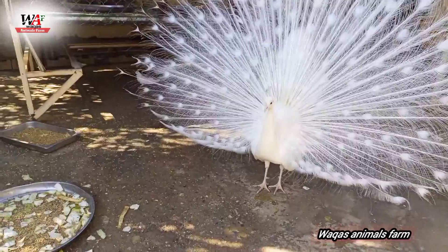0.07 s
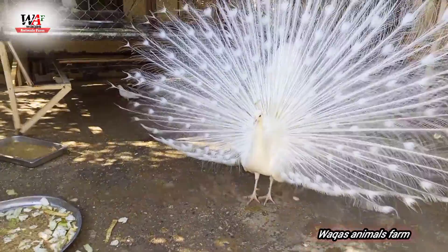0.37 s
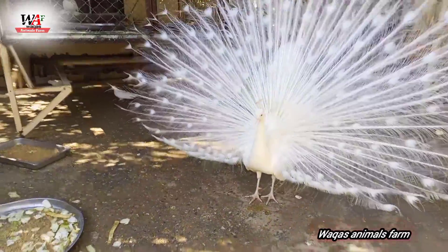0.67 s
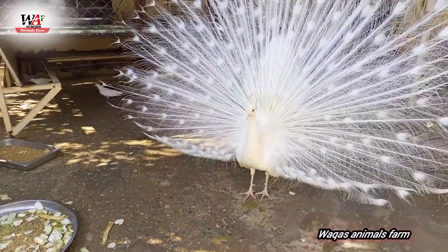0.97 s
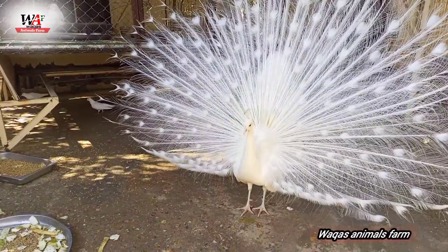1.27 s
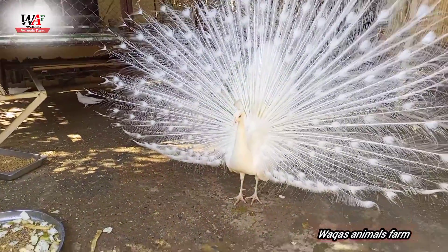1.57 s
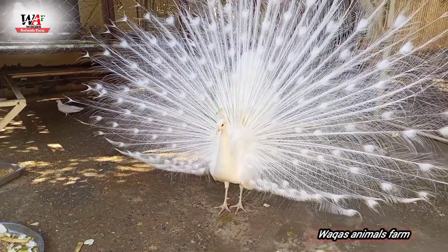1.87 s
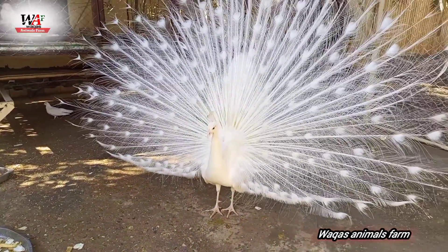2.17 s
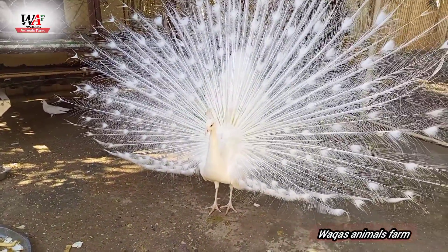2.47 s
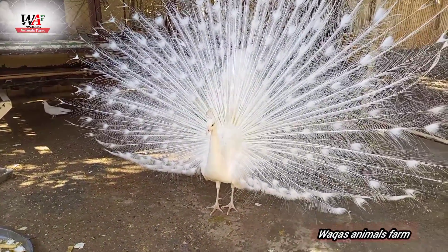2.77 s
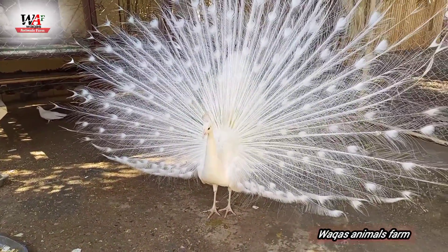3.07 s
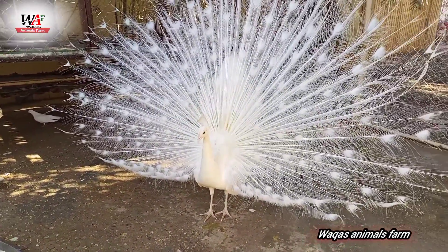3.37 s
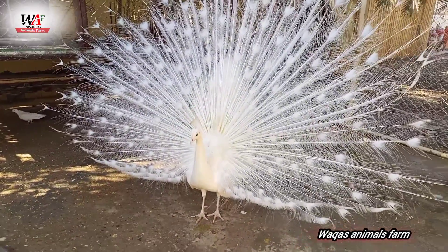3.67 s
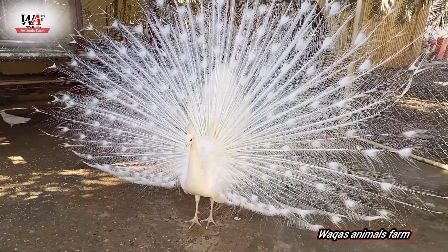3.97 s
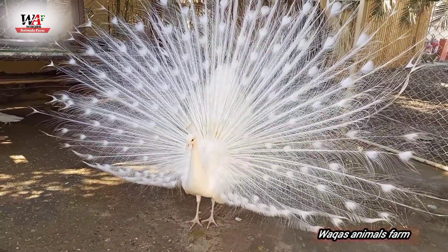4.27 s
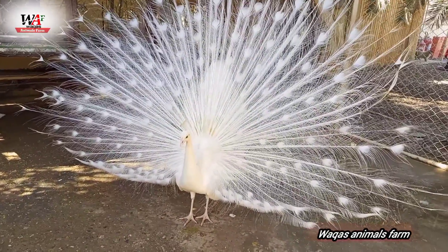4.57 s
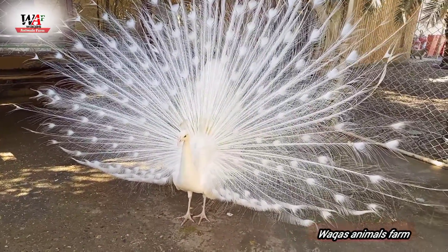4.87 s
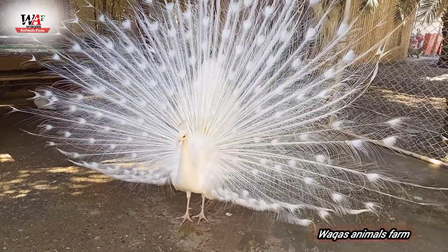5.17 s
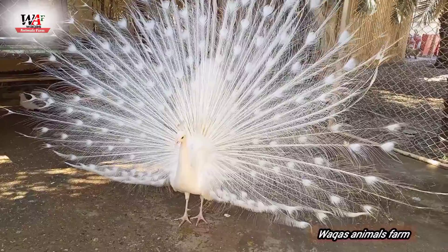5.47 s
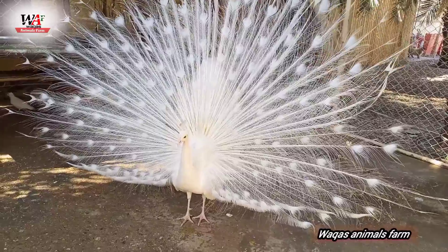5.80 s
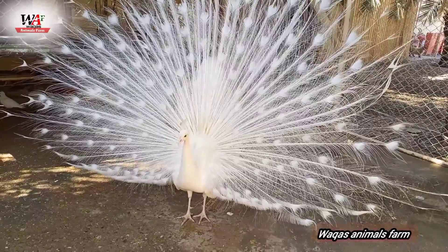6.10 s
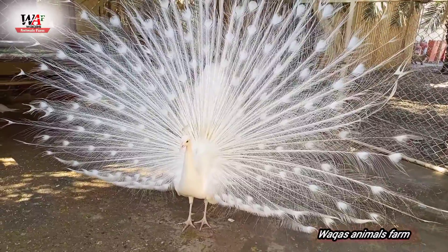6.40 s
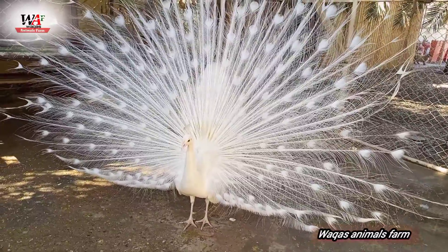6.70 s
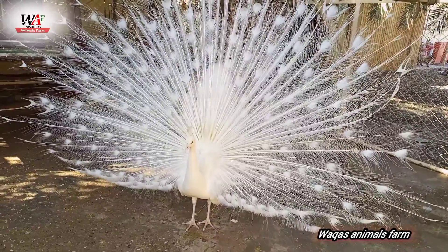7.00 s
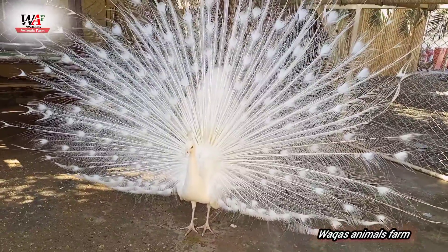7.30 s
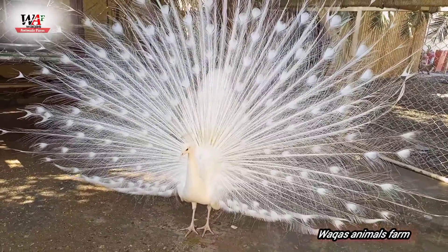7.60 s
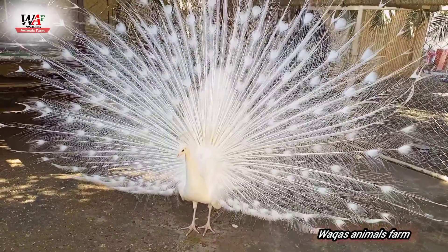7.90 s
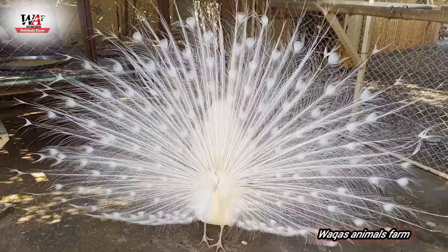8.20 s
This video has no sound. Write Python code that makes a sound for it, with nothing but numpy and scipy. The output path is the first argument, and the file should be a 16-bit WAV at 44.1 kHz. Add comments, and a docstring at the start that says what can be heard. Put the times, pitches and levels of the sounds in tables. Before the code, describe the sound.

Overlapping sparrow-like chirps, whistles and harsh churrs over soft outdoor air and a faint motor hum, with a couple of sharp knocks.

```python
"""A roofed farm pen, where a flock of sparrow-like birds chirps and scolds and hard walls smear every note.
Each call is a few harmonics gliding in pitch, shaken by the flutter of the bird's syrinx.
Two sharp clacks, a few ticks and two soft bumps sound nearby, each a noise burst through a resonance.
Underneath lie outdoor air, a motor's hum, faint far hoots and brief patches of high, grainy hiss.
One close microphone hears it all in mono."""
import sys
import numpy as np
from scipy import signal
from scipy.fft import rfft, irfft
from scipy.io import wavfile
from scipy.ndimage import uniform_filter1d

SR = 44100
rng = np.random.default_rng(int(sys.argv[2]) if len(sys.argv) > 2 else 0)


def unload_audio(sound):
    """Save the sound as a 16-bit wav file, at the path given as the first command line argument."""
    columns = np.transpose(np.atleast_2d(sound))
    # keep every value between -1 and 1, then stretch to whole-number steps
    steps = np.round(np.clip(columns, -1, 1) * 32767)
    wavfile.write(sys.argv[1], SR, steps.astype(np.int16))


N = 363825
TIME = np.arange(N) / SR

# The nearly pure timbre of a chirp. Each row: harmonic number, level in dB.
CHIRP_VOICE = [(1, 1), (2, -30.5), (3, -39.5)]
# Call shapes. Each gives starting pitch and ending pitch as shares of the middle pitch, then flutter depth.
CHIRP_SHAPE = (1.15, .83, 0.1016)  # a buzzy downward sweep
BUZZ_SHAPE = (1.04, 0.92, 0.109)  # a wide rasp, almost level
WHISTLE_SHAPE = (1.08, 0.94, 0.018)  # a clear downward slide
PEEP_SHAPE = (1.02, 0.97, 0.02)  # a thin held tone
CHEEP_SHAPE = (0.8, 0.79, 0.036)  # rises and falls


def undb(db):
    """Decibels to gain."""
    return 10 ** (np.asarray(db) / 20)


def unit(x):
    """Scale to rms 1."""
    return x / np.sqrt(np.mean(x ** 2) + 1e-20)


def add(track, s, sound):
    """Mix a sound into a track, starting at s seconds."""
    i = int(np.clip(s * SR, 0, N - 1))
    track[i:i + len(sound)] += sound[:N - i]


def curve(rows):
    """Join (seconds, value) rows by straight lines."""
    return np.interp(TIME, *np.transpose(rows))


def cut(x, hz, keep, order=2):
    """Keep the "low" or "high" side of a frequency."""
    return signal.sosfilt(signal.butter(order, hz, keep, fs=SR, output="sos"), x)


def resonance(x, hz, width_hz):
    """The same two-pole band-pass twice over, gain 1 at the centre."""
    peak = signal.iirpeak(hz, hz / width_hz, fs=SR)
    return signal.lfilter(*peak, signal.lfilter(*peak, x))


def walk(rate_hz):
    """Smooth random drift, rms 1."""
    hold = int(SR / rate_hz)
    steps = np.repeat(rng.standard_normal(N // hold + 1), hold)[:N]
    return unit(uniform_filter1d(steps, hold))


def air():
    """Outdoor air: a soft, broad noise bed that gently swells."""
    # The colour of the bed. Each row: frequency in Hz, relative level in dB.
    spectrum = [(25, -13.5), (50, -14.5), (100, -1), (200, 0), (320, -7), (850, -7), (1200, -8.5),
                (2000, -6), (4000, -8.5), (8000, -21.5), (10000, -30), (15500, -28)]
    # Its slow swell. Each row: time in seconds, level in dB.
    levels = [(0, -66), (3.2, -63), (5.4, -64.5), (6.5, -61.5)]
    hz, db = np.transpose(spectrum)
    bins_hz = np.maximum(np.arange(N // 2 + 1) * SR / N, 1)
    colour = undb(np.interp(np.log(bins_hz), np.log(hz), db))
    bed = unit(irfft(rfft(rng.standard_normal(N)) * colour, N))
    return bed * undb(curve(levels) + .5 * walk(9.3))


def motor(waver, wobble_db):
    """A motor's low hum, wandering slightly in speed and strength."""
    # The tones of the hum. Each row: frequency in Hz, relative level in dB.
    partials = [(75.2, 0), (177.6, -12)]
    # Its swell. Each row: time in seconds, level in dB.
    levels = [(0, -68), (1.1, -68.5), (1.45, -64.5), (2.3, -71.5), (2.95, -63), (3.6, -64.5), (4.3, -66.5),
              (6.3, -64.5), (8.2, -68.5)]
    clock = np.cumsum(1 + waver * walk(2.3)) / SR
    hum = sum(undb(db) * np.sin(2 * np.pi * hz * clock) for hz, db in partials)
    return np.sqrt(2) * undb(curve(levels) + wobble_db * walk(6.6)) * hum


def far_hoots(blur):
    """Faint far hoots, blurred by many paths into narrow noise bands; the short ones are the hoarsest."""
    # The hoots. Each row: start in seconds, length in seconds, pitch in Hz, level in dB.
    hoots = [(2.701, 1.23, 879, -77.5), (6.072, 0.19, 717, -66), (6.303, 0.99, 1093, -74.5),
             (6.354, 0.92, 713, -75.5), (6.998, 1.15, 884, -74.5), (7.475, 0.21, 885, -64.5)]
    out = np.zeros(N)
    for s, length, hz, db in hoots:
        n = int(length * SR)
        band = resonance(rng.standard_normal(2 * SR), hz, width_hz=blur / length)[-n:]
        add(out, s, undb(db) * signal.windows.tukey(n, .5) * unit(band))
    return out


def treble_hiss(grain_db):
    """Brief, faint patches of high, grainy hiss."""
    # The patches. Each row: start in seconds, length in seconds, level in dB.
    patches = [(2.0, 0.11, -67), (3.52, 0.2, -73.5), (5.758, .05, -63.5), (5.907, 0.23, -63),
               (6.99, 0.17, -70)]
    out = np.zeros(N)
    hiss = cut(rng.standard_normal(N), 6000, "high")
    grains = unit(hiss * undb(grain_db * walk(290)))
    for s, length, db in patches:
        n = int(length * SR)
        add(out, s, undb(db) * signal.windows.tukey(n, .5) * np.roll(grains, -int(s * SR))[:n])
    return out


def pen_echoes(x, t60, treble_t60, build_s):
    """Dense echoes off walls and roof; the treble dies sooner."""
    t = TIME[:SR]
    low = cut(rng.standard_normal(SR), 6000, "low") * 1000. ** (-t / t60)
    high = cut(rng.standard_normal(SR), 6000, "high") * 1000. ** (-t / treble_t60)
    tail = (low + high) * (1 - np.exp(-t / build_s))
    return signal.fftconvolve(x, tail / np.sqrt(np.sum(tail ** 2)))[:N]


def burst(t60):
    """The brief rattle of a contact: lopsided noise that falls 60 dB in t60 seconds."""
    t = TIME[:SR // 2]
    return np.sqrt(3) * rng.uniform(-1.8, 1, len(t)) * 1000. ** (-t / t60)


def bumps():
    """Dull blows set something hollow ringing."""
    # The blows. Each row: start in seconds, relative level in dB, 60 dB decay time in seconds.
    blows = [(0.204, -59, 0.056), (0.219, -50, 0.087), (0.774, -61, 0.17)]
    # The hollow body's resonances. Each row: frequency in Hz, width in Hz, gain in dB.
    modes = [(336, 480, -4), (426, 153, -3)]
    force = np.zeros(N)
    for s, db, t60 in blows:
        add(force, s, 10 * undb(db) * burst(t60))
    return sum(undb(db) * resonance(force, hz, width_hz) for hz, width_hz, db in modes)


def clacks():
    """Small hard things strike: a quickly damped resonance for each contact."""
    # Clacks and ticks. Each row: start in seconds, relative level in dB, 60 dB decay time in seconds,
    # centre in Hz, width in Hz.
    contacts = [(.5315, -65, 0.008, 3500, 12000), (1.764, -34, 0.068, 11700, 17000),
                (1.771, -32, 0.0079, 6650, 10000), (1.96, -49, 0.03, 11000, 14900),
                (1.967, -36.5, 0.02, 10400, 12900), (1.975, -41, 0.072, 10600, 14000),
                (1.984, -38.5, 0.063, 9500, 14100), (5.976, -35.5, 0.023, 1600, 600)]
    out = np.zeros(N)
    for s, db, t60, hz, width_hz in contacts:
        add(out, s, 1.9 * undb(db) * resonance(burst(t60), hz, width_hz))
    return cut(out, 1300, "high", order=4)


def tremor(hz, width_hz, warble_hz, warble):
    """The flutter of a syrinx: a quick buzz on a slower warble."""
    buzz = unit(resonance(rng.standard_normal(N), hz, width_hz))
    slow = unit(resonance(rng.standard_normal(N), warble_hz, warble_hz))
    return unit(np.tanh(buzz + warble * slow))  # the syrinx can stretch only so far


def perch(sound, longest_s=.007, strength=0.34):
    """Surfaces next to the bird add three quick reflections, which colour each note in its own way."""
    bare = np.pad(sound, (0, SR // 40))
    coloured = bare.copy()
    for lag, size in rng.random((3, 2)):
        coloured += strength * (.5 + size) * np.roll(bare, int(lag * longest_s * SR))
    return coloured * np.sqrt(np.sum(bare ** 2) / np.sum(coloured ** 2))


def note(length, middle_hz, shape, shake, voice, throb, overtones_db=0):
    """One note: the pitch curves through three points; flutter shakes it and, by throb, the loudness."""
    start, end, flutter = shape
    progress = np.linspace(0, 1, int(length * SR))
    wobble = flutter * shake[:len(progress)]
    glide = np.polyfit([0, .5, 1], middle_hz * np.array([start, 1, end]), 2)
    hz = np.polyval(glide, progress) * (1 + wobble)
    phase = 2 * np.pi * np.cumsum(hz) / SR
    # the beak opens differently on every note, so the weak harmonics come and go
    gapes_db = overtones_db + rng.uniform(-2, 2, len(voice))
    tone = sum(undb(db + gape * (db < 0)) * np.sin(k * phase) * (k * hz < SR / 2)
               for (k, db), gape in zip(voice, gapes_db))
    swell = np.sin(np.pi * progress) * unit(np.exp(throb * wobble))
    return perch(np.sqrt(2) * tone * swell)


def far_flock(count, centre_hz, spread, high_share, high_hz, low_share, low_hz, scatter_db):
    """Far birds: mixed calls in the middle register, thin peeps above and clear whistles below."""
    # The ebb and flow of the chatter. Each row: time in seconds, relative level in dB.
    levels = [(0, -40.5), (.55, -59), (1.1, -47.5), (1.9, -51), (2.6, -50), (3.45, -49.5), (3.8, -58),
              (4.42, -62.5), (4.7, -60.5), (5.15, -58.5), (5.52, -71), (5.8, -52.5), (6.1, -53),
              (6.7, -52.5), (7.3, -50.5), (8.2, -52.5)]
    out = np.zeros(N)
    shake = tremor(hz=145.2, width_hz=100.6, warble_hz=45.1, warble=1.0)
    for i, (when, kind, length, offset) in enumerate(rng.random((count, 4))):
        pitch, size = rng.uniform(-1, 1, 2)
        hz, db, shape = centre_hz, 0, rng.choice([BUZZ_SHAPE, CHIRP_SHAPE, WHISTLE_SHAPE, CHEEP_SHAPE])
        if kind < high_share:
            hz, db, shape = high_hz, -8, PEEP_SHAPE
        elif kind > 1 - low_share:
            hz, db, shape = low_hz, -11, WHISTLE_SHAPE
        sound = note(.02 + .04 * length, hz * np.exp(spread * pitch), shape,
                     np.roll(shake, -int(offset * N)), CHIRP_VOICE, throb=0.32, overtones_db=2.5)
        add(out, (i + when) / count * N / SR, sound * undb(db + scatter_db * size))
    return unit(out) * undb(curve(levels))


def calls(notes, shape, voice, shake, throb, gain_db, dryness):
    """Calls of one kind as (direct, sent to the walls); loud birds are the near ones and so the drier."""
    direct, sent = np.zeros((2, N))
    for s, length, hz, db, *overtones_db in notes:
        own_shake = np.roll(shake, -int(s * SR))
        sound = undb(db + gain_db) * note(length, hz, shape, own_shake, voice, throb, *overtones_db)
        direct_share = np.clip(dryness + .025 * (db + 40), .15, .85)
        add(direct, s, np.sqrt(direct_share) * sound)
        add(sent, s, np.sqrt(1 - direct_share) * sound)
    return np.array([direct, sent])


def scolding(rasp):
    """Harsh churrs and hoarse squawks: low, rasping notes rich in harmonics."""
    # Churrs, then squawks. Each row: start in seconds, length in seconds, pitch in Hz, relative dB.
    churrs = [(.074, 0.072, 1830, -51), (.406, 0.048, 1787, -59), (1.46, 0.068, 1790, -51.5),
              (1.655, 0.085, 2115, -47.5), (1.73, 0.094, 1926, -48), (2.35, 0.11, 1748, -52.5),
              (2.522, 0.1, 1988, -49.5), (2.68, 0.073, 1975, -50), (3.89, .13, 1930, -49),
              (5.33, 0.095, 1976, -57.5), (7.31, 0.059, 1930, -56.5)]
    squawks = [(.232, .075, 2030, -49.5), (1.585, .08, 2174, -56)]
    # Their timbres; the beak favours a churr's second harmonic. Each row: harmonic number, level in dB.
    churr_voice = [(1, -9), (2, 5.5), (3, -4.5), (4, -19.5), (5, -25.5)]
    squawk_voice = [(1, -2.5), (2, -3), (3, -4), (4, -25)]
    sagging, rising = (1.1, 0.81, 0.094), (.78, 1.12, 0.064)
    return (calls(churrs, sagging, churr_voice, rasp, throb=0.2, gain_db=3.5, dryness=1.0)
            + calls(squawks, rising, squawk_voice, rasp, throb=0.18, gain_db=3.0, dryness=0.99))


def cheeping(quiver):
    """Bending notes: cheeps arch over, tweets dip and turn up."""
    # Cheeps, then tweets. Each row: start in seconds, length in seconds, pitch in Hz, relative dB.
    cheeps = [(.745, 0.058, 6970, -51.5), (1.074, 0.025, 4740, -40.5), (1.308, 0.052, 4500, -51),
              (1.445, 0.042, 6940, -57), (1.725, 0.05, 2900, -45), (2.125, 0.064, 4106, -39),
              (2.435, 0.045, 4460, -43.5), (2.592, 0.069, 4410, -43), (2.657, 0.029, 3850, -40.5),
              (2.721, 0.04, 3445, -43.5), (2.96, 0.043, 4530, -61), (4.328, 0.042, 6450, -59),
              (5.183, 0.032, 2555, -57), (5.298, 0.05, 4790, -45), (5.555, 0.074, 4030, -55),
              (6.535, 0.037, 5790, -50.5), (6.632, 0.024, 6780, -57)]
    tweets = [(.695, 0.09, 3904, -45.5), (.762, 0.031, 3600, -41), (.825, 0.019, 5750, -44),
              (1.152, 0.039, 4004, -40), (2.442, 0.076, 3450, -44), (2.792, 0.062, 4050, -44.5),
              (2.852, 0.054, 3160, -41), (3.785, 0.063, 4630, -32), (3.84, 0.053, 2726, -42),
              (3.836, 0.057, 3600, -35), (4.017, 0.054, 3920, -46), (4.83, 0.13, 3800, -53),
              (6.03, 0.03, 3440, -53), (7.146, 0.057, 3410, -41)]
    upturned = (1.1, 1.3, 0.05)
    return (calls(cheeps, CHEEP_SHAPE, CHIRP_VOICE, quiver, throb=.34, gain_db=4.0, dryness=0.93)
            + calls(tweets, upturned, CHIRP_VOICE, quiver, throb=1.0, gain_db=1.5, dryness=0.5))


def whistling(quiver):
    """Clear tones with little flutter: sliding whistles, held peeps and steep swoops."""
    # Whistles, peeps and swoops. Each row: start in seconds, length in seconds, pitch in Hz,
    # relative level in dB, overtone lift in dB.
    whistles = [(.112, 0.041, 2586, -53, 2), (.866, 0.057, 4796, -29, -5.5), (.935, 0.03, 2850, -40.5, 0),
                (1.001, 0.054, 4720, -42, -15), (1.045, 0.044, 2590, -50, 7),
                (1.355, 0.04, 4120, -28.5, -21), (1.361, 0.012, 5250, -36.5, -11),
                (1.412, 0.023, 3853, -29.5, -15), (2.574, 0.039, 5350, -40, -7),
                (2.58, 0.031, 2468, -44.5, -2), (2.83, .09, 6350, -51, 4), (3.68, 0.072, 6500, -52, -6),
                (3.763, 0.022, 5790, -35.5, 3), (3.856, 0.0393, 3940, -36, -13),
                (3.98, 0.086, 2525, -47, 12), (4.168, 0.061, 3510, -44, -7), (4.255, 0.054, 2510, -53, 17),
                (4.548, 0.032, 2725, -48.5, -10), (4.963, 0.014, 2790, -48, -10),
                (5.64, 0.047, 4520, -50.5, -9), (6.415, 0.043, 2640, -48.5, -10),
                (6.905, 0.027, 6100, -47, -10), (7.021, 0.04, 4726, -28.5, -8.5)]
    peeps = [(.078, 0.06, 4337, -47, 16.5), (.11, 0.11, 5630, -46, -22), (1.605, 0.053, 5380, -47, -2),
             (1.663, 0.063, 4430, -40.5, 2), (1.72, 0.024, 5680, -36.5, -4),
             (2.795, 0.034, 7630, -49.5, -10), (3.228, 0.054, 4634, -43, 8),
             (3.277, 0.026, 2700, -40.5, -1), (3.37, 0.086, 3383, -54.5, -5),
             (5.272, 0.029, 4380, -42.5, -5), (5.312, 0.048, 6150, -48.5, 2), (5.468, 0.021, 2590, -46, -7),
             (6.325, 0.039, 5500, -44, 0), (6.338, 0.031, 7130, -48.5, 0), (6.485, 0.062, 2580, -48.5, -1),
             (6.615, 0.063, 3710, -46, -1), (6.68, 0.052, 5460, -43, -1), (6.935, 0.044, 3420, -45.5, -6),
             (6.95, 0.099, 5690, -41, -20), (7.045, 0.023, 5120, -34, 4), (7.463, 0.028, 4520, -52, 20.5),
             (7.478, 0.05, 3450, -39, -9), (7.565, 0.029, 5430, -53, -5)]
    swoops = [(2.752, 0.043, 2610, -49.5, -2), (5.39, 0.075, 4930, -49, -3), (7.505, 0.075, 3070, -43, 0)]
    # A pure tone with a faint octave. Each row: harmonic number, level in dB.
    voice = [(1, 0), (2, -23.5)]
    plunging = (1.3, .83, 0.036)
    return (calls(whistles, WHISTLE_SHAPE, voice, quiver, throb=0.31, gain_db=2.5, dryness=0.67)
            + calls(peeps, PEEP_SHAPE, voice, quiver, throb=0.71, gain_db=-0.5, dryness=0.78)
            + calls(swoops, plunging, voice, quiver, throb=0.34, gain_db=3, dryness=1.0))


def chirping(quiver):
    """Falling chirps and level twitter, made buzzy by a deep flutter."""
    # The chirps. Each row: start in seconds, length in seconds, pitch in Hz, relative level in dB.
    chirps = [(.262, 0.051, 3650, -39), (.335, 0.045, 3650, -46), (.44, 0.033, 3250, -46),
              (.858, 0.041, 3490, -39.5), (1.092, 0.14, 4100, -42.5), (1.17, 0.066, 3250, -50),
              (1.36, 0.098, 3834, -40), (1.975, 0.054, 5940, -40.5), (2.013, 0.061, 5180, -40),
              (2.049, 0.04, 5890, -37.5), (3.066, 0.094, 3950, -44.5), (3.27, 0.11, 3970, -56),
              (3.885, .13, 3514, -45.5), (4.22, 0.049, 3616, -43), (4.755, 0.078, 3610, -48),
              (4.93, 0.091, 3400, -50), (6.36, 0.062, 3950, -50.5), (6.56, 0.024, 4400, -45),
              (7.056, 0.066, 3120, -41)]
    # The twitter. Each row: as for the chirps, then overtone lift in dB.
    buzzes = [(1.09, .07, 6220, -48, -4), (3.772, 0.059, 5180, -37, 0), (4.05, .11, 3970, -43.5, -6),
              (4.185, 0.039, 6240, -57, 4), (4.48, 0.042, 5120, -51.5, 9), (4.51, .12, 3996, -46.5, -3),
              (4.635, 0.12, 4100, -52, -5), (4.82, 0.15, 3870, -48.5, -15), (5.755, 0.039, 5060, -51.5, 10),
              (5.915, 0.081, 4890, -43.5, 7), (6.01, 0.15, 5010, -52.5, 8), (6.19, .093, 4970, -52, 4),
              (7.014, .065, 4880, -36.5, -10), (7.45, 0.084, 3990, -41, 3), (7.605, 0.079, 4190, -44, 8),
              (7.885, 0.043, 6160, -56.5, 14), (7.915, 0.12, 4085, -44, -1)]
    return (calls(chirps, CHIRP_SHAPE, CHIRP_VOICE, quiver, throb=0.6, gain_db=2.0, dryness=0.65)
            + calls(buzzes, BUZZ_SHAPE, CHIRP_VOICE, quiver, throb=0.17, gain_db=0.5, dryness=0.62))


def scene():
    """Birds and knocks in the pen, over patches of hiss, hoots, hum and air."""
    quiver = tremor(hz=118.0, width_hz=90.5, warble_hz=45.1, warble=1.04)
    rasp = tremor(hz=240.5, width_hz=66.0, warble_hz=53.1, warble=0.69)
    direct, sent = chirping(quiver) + whistling(quiver) + cheeping(quiver) + scolding(rasp)
    # the birds face every way, so their overtones arrive mostly by way of the walls
    direct = cut(direct, 8000, "low")
    far = far_flock(count=340, centre_hz=3807, spread=0.21, high_share=0.36, high_hz=5834,
                    low_share=0.14, low_hz=2570, scatter_db=2.5)
    knocks = clacks() + bumps()
    echoes = pen_echoes(sent + 0.92 * far + undb(-25) * knocks, t60=0.27, treble_t60=0.18, build_s=0.0013)
    bed = air() + treble_hiss(grain_db=1.5) + far_hoots(blur=16) + motor(waver=0.00548, wobble_db=2.0)
    mono = direct + 0.26 * far + knocks + echoes + bed
    return np.array([mono, mono])


def record(dry):
    """A small microphone port ripples the treble; the ends fade quickly and the very top is cut."""
    # The microphone's colour. Each row: frequency in Hz, gain in dB.
    response = [(7000, 1), (8200, -2.5), (9100, 4), (9900, 10), (11300, 6), (13600, -1), (15300, 6.5)]
    open_s, close_s, top_hz = .073, 8.19, 15700
    bins_hz = np.arange(N // 2 + 1) * SR / N
    coloured = irfft(rfft(dry) * undb(np.interp(bins_hz, *np.transpose(response))), N)
    gate = np.interp(TIME, [open_s, open_s + .005, close_s - .01, close_s], [0, 1, 1, 0])
    return signal.sosfilt(signal.ellip(8, .2, 70, top_hz, fs=SR, output="sos"), coloured * gate)


dry = scene()
out = record(dry)
unload_audio(out)
```